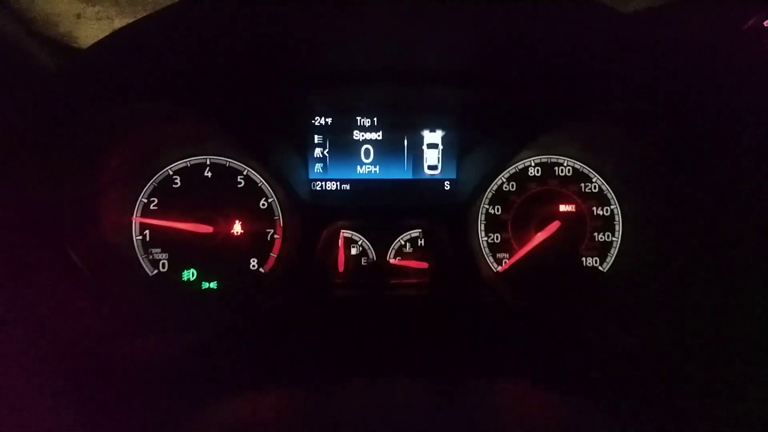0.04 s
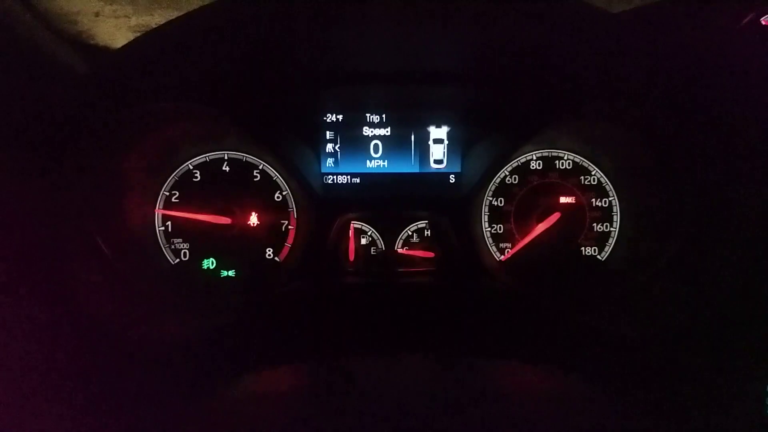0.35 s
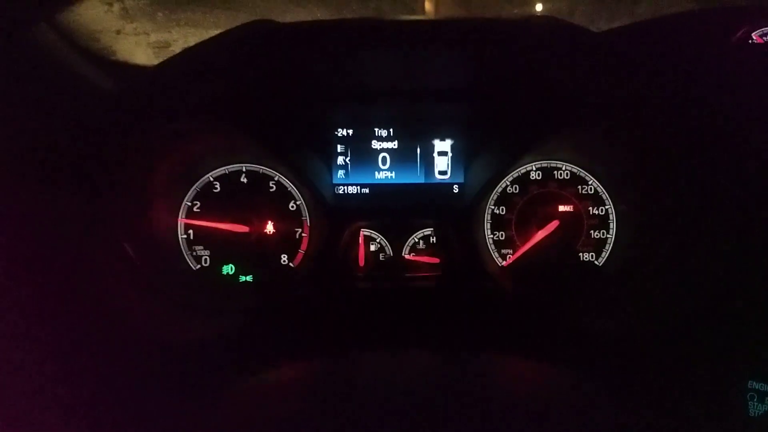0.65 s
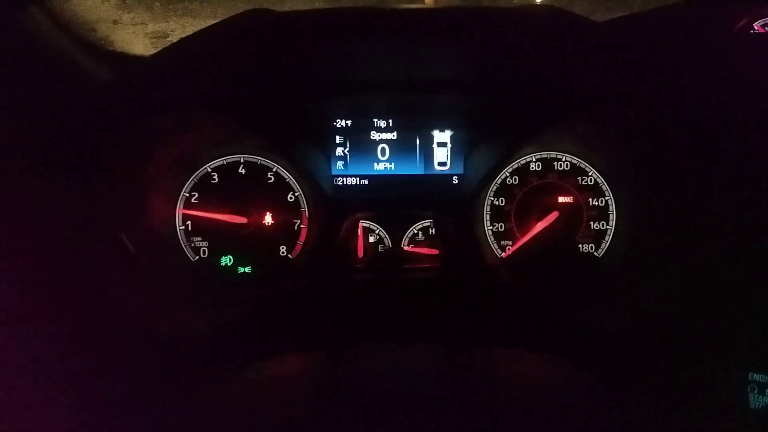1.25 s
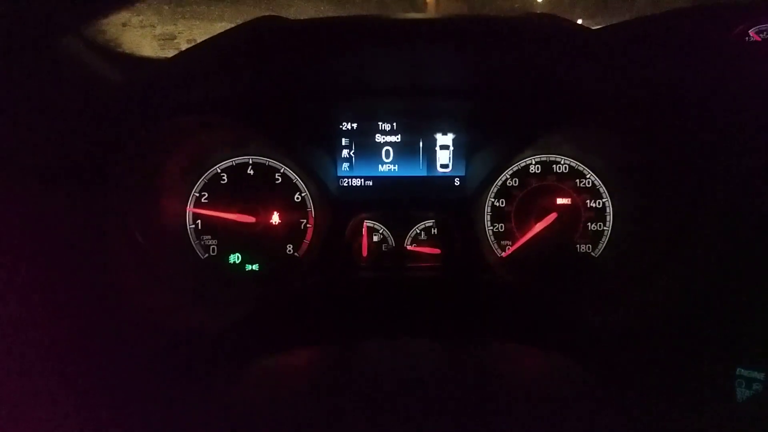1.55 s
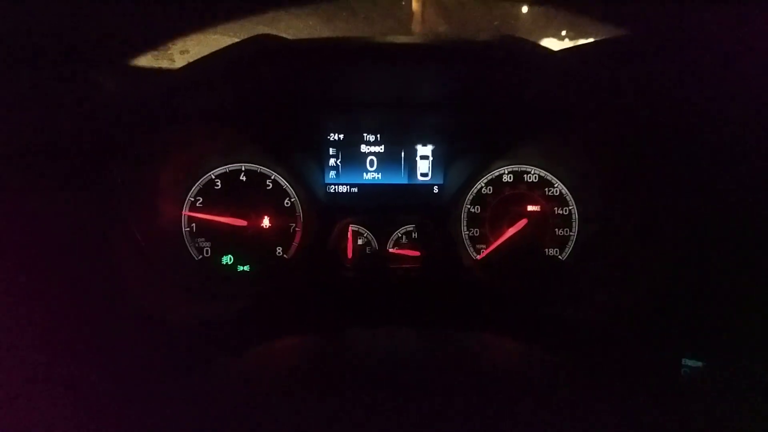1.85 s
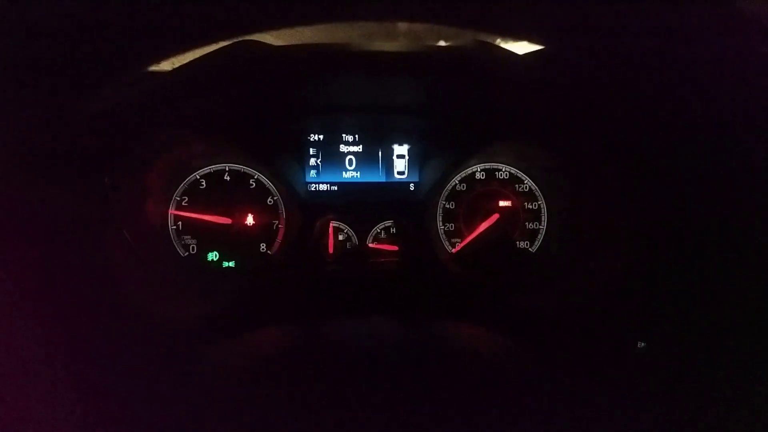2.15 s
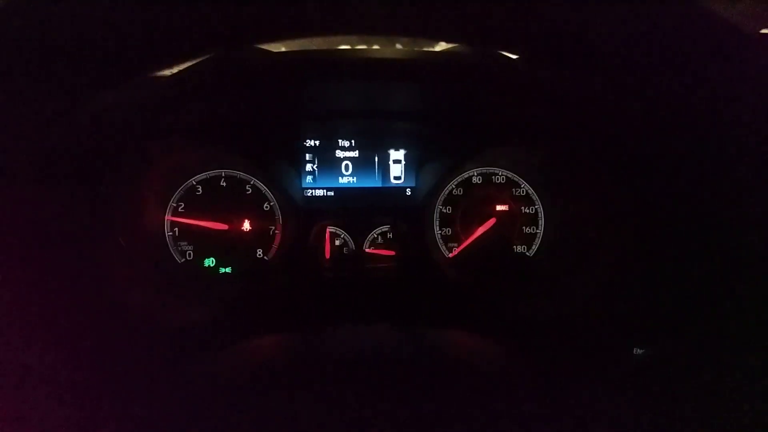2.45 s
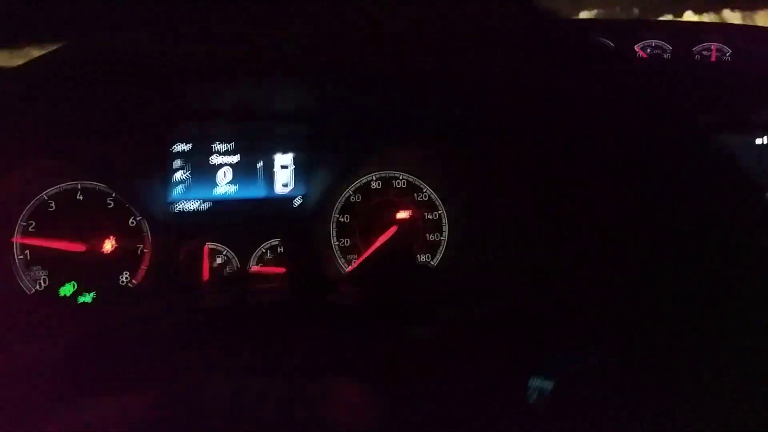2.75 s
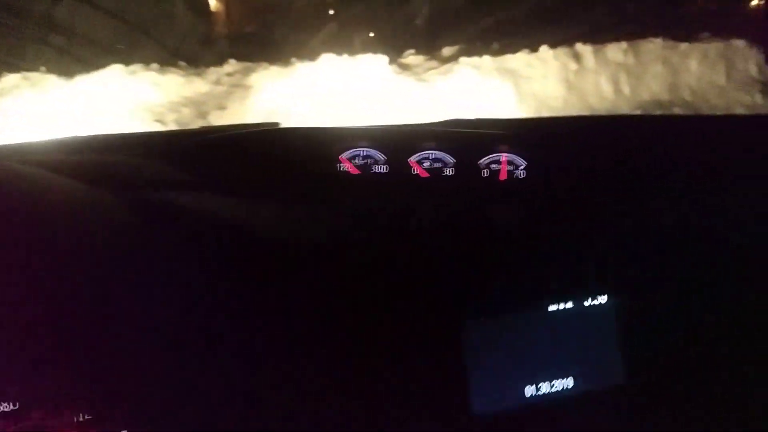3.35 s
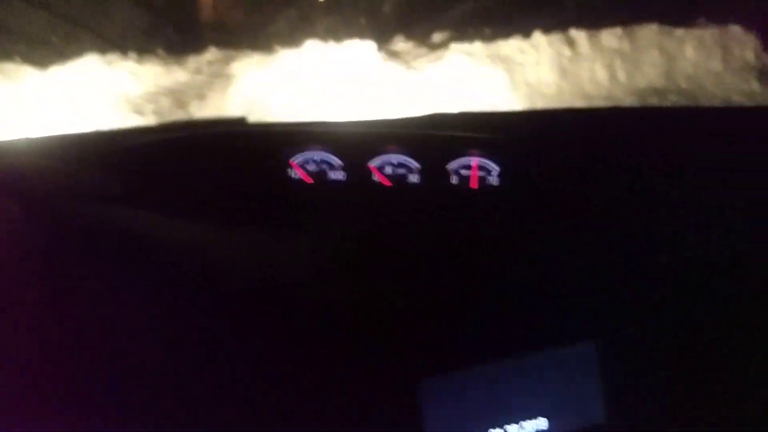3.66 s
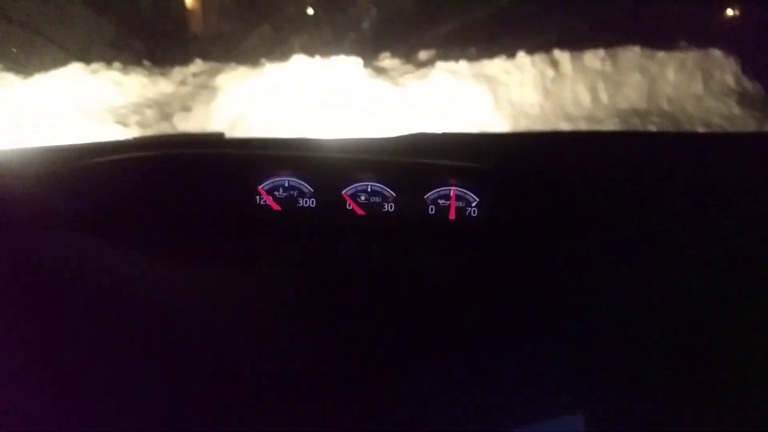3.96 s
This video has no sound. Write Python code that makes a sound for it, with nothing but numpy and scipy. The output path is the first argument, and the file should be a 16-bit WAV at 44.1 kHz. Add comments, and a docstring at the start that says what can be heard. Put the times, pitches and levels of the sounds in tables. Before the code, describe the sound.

A car engine idles fast, a steady low boom over a dull clatter, heard from the driver's seat. Past halfway, a jacket rustles and fingers bump the moving microphone, with one sharp plastic click.

```python
"""In the driver's seat of a car, a cold four-cylinder engine idles fast. Its firing makes the cabin
boom, at twice the firing rate, over a dull clatter. A jacket rustles as the hand-held microphone
swings from the steering wheel to the middle of the dashboard, with soft bumps and one sharp click.
At the dashboard the engine's overtones have a different balance and a throbbing whine comes through.
A faint electrical hiss lies under it all."""
import sys
import numpy as np
from scipy import signal
from scipy.fft import rfft, irfft
from scipy.io import wavfile

SR = 44100
rng = np.random.default_rng(int(sys.argv[2]) if len(sys.argv) > 2 else 0)


def generate_wav(sig):
    """Save sig (samples, or channels by samples) to the path in sys.argv[1] as 16-bit PCM at SR."""
    pcm = np.round(np.clip(np.atleast_2d(sig).T, -1, 1) * 32767).astype(np.int16)
    wavfile.write(sys.argv[1], SR, pcm)


N = 176400
T = np.arange(N) / SR
HZ = np.maximum(np.fft.rfftfreq(N, 1 / SR), 1)


# The engine's tones at the wheel and at the dashboard; a pan above 0 leans left.
# waves_per_turn, wheel_db, dash_db, wheel_pan_db, dash_pan_db
ENGINE_TONES = [(2, -41.5, -40.5, 2, 3), (4, -23.5, -23.5, 3, 3), (6, -42.5, -40.5, -3, 43),
                (8, -50.5, -50, 28, 15), (10, -49.5, -46.5, -26, 13)]
# How the boom swells: time_s, gain_db
BOOM_GAIN = [(0, 1.3), (.75, 1.8), (1.55, 0.5), (3.1, 0.05), (3.7, 0.9)]

def engine_tones(crank, moved, boom_per_turn=4):
    """Firing pulses make tones; echoes in the cabin make each louder or softer from spot to spot."""
    out = 0
    for per_turn, wheel_db, dash_db, wheel_pan, dash_pan in ENGINE_TONES:
        gain = from_db(blend(wheel_db, dash_db, moved))
        phase = per_turn * crank
        if per_turn == boom_per_turn:
            uneven_cylinders = 1 + 0.035 * np.cos(crank / 2) + 0.035 * np.cos(crank)
            gain *= uneven_cylinders * from_db(in_time(BOOM_GAIN) + 0.5 * drift(rate_hz=4.2))
            phase = phase + np.array([[0], [1]])  # the right side is one radian ahead
        out += gain * pan(blend(wheel_pan, dash_pan, moved)) * tone(phase)
    return out


# The clatter's dull colour: pitch_hz, gain_db
CLATTER_COLOUR = [(20, -28), (45, -5.5), (130, 3.5), (200, -3), (330, -2.5), (560, -5), (800, -12.5),
                  (1700, -19.5), (2400, -23), (3500, -36), (7000, -51)]

def engine_clatter(crank, moved, wheel_db=-36.5, dash_db=-33.5, repeat_share=0.57, rumble_top_hz=337):
    """Valves and injectors rattle in a pattern that repeats every engine cycle (two turns)."""
    cycles = crank / (4 * np.pi)
    cycle_samples = int(N / cycles[-1])
    place_in_cycle = (cycles % 1 * cycle_samples).astype(int)
    pattern = rng.standard_normal((2, cycle_samples))[:, place_in_cycle]
    noise = np.sqrt(repeat_share) * pattern + np.sqrt(1 - repeat_share) * white()
    rumble = irfft(rfft(noise) / (1 + (HZ / rumble_top_hz) ** 4), N)
    cylinder_pulse = 1 + 0.42 * np.cos(2 * crank) + 0.11 * np.cos(crank / 2)
    pump_pulse = 1 + 0.13 * np.cos(3 * crank / 2)
    clatter = rumble * cylinder_pulse + (noise - rumble) * pump_pulse
    return from_db(blend(wheel_db, dash_db, moved)) * surround(clatter, CLATTER_COLOUR)


def engine_chug(crank, moved, wheel_db=-46, dash_db=-40.5, sharpness=8.7, waves_per_turn=6):
    """One cylinder runs harder than the rest: a low thud in every engine cycle."""
    thud = np.exp(sharpness * np.cos(crank / 2)) * np.sin(waves_per_turn * crank)
    return from_db(blend(wheel_db, dash_db, moved)) * unit_level(thud)


# The tones of the turning parts: waves_per_turn, wheel_db, dash_db
WHIRR_TONES = [(13, -56, -47), (15.8, -54, -58), (19, -57, -53), (20, -54, -48), (22, -49, -44.5),
               (25, -64, -55), (26.2, -53, -62), (32.5, -66, -57), (34, -68, -55), (40, -64, -59),
               (44.1, -57, -68), (47.7, -58, -61)]

def engine_whirr(crank, moved):
    """Gears, belt and valve parts give thin, slightly wavering tones as they turn."""
    out = 0
    for per_turn, wheel_db, dash_db in WHIRR_TONES:
        offset_rad = rng.uniform(0, 2 * np.pi) + rng.normal(0, 0.4, (2, 1))
        phase = per_turn * crank + offset_rad + 0.19 * drift(rate_hz=5.3)
        out += from_db(blend(wheel_db, dash_db, moved)) * tone(phase)
    return pan(4) * out


def engine_whine(crank, moved, dash_db=-45.5, waves_per_turn=58.5, right_lag_rad=0.63):
    """A wavering whine throbs three times per engine cycle, as a three-lobed fuel pump would."""
    sway = np.sin(crank) + 0.7 * drift(rate_hz=20)
    phase = waves_per_turn * crank + sway - np.array([[0], [right_lag_rad]])
    throb = np.exp(0.52 * np.cos(3 * crank / 2) + 0.07 * np.cos(crank / 2))
    return from_db(dash_db) * moved * unit_level(throb * np.sin(phase))


# How loudly the sleeve rustles: time_s, level_db
RUSTLE_LEVEL = [(0, -51.5), (.5, -63), (1.2, -58.5), (1.48, -50), (1.87, -55.5), (1.95, -65), (2.2, -59),
                (2.29, -47.5), (2.5, -43), (2.72, -38.5), (2.88, -40.5), (3.1, -39.5), (3.4, -41),
                (3.56, -41.5), (3.72, -52.5), (4, -63)]
# The rustle's colour: pitch_hz, gain_db
RUSTLE_COLOUR = [(200, 6), (700, -10), (1300, -2), (2300, -0.5), (3800, -3), (5500, -7.5), (8000, -11.5),
                 (11000, -15.5), (16000, -23)]
# How loudly sliding cloth hisses: time_s, level_db
SLIDE_LEVEL = [(0, -57), (.5, -68), (1.2, -71), (1.38, -55), (1.86, -62), (2, -80), (2.2, -70), (2.3, -54),
               (2.66, -46), (2.8, -70), (3.55, -64), (3.7, -81)]
# Its airy colour: pitch_hz, gain_db
SLIDE_COLOUR = [(4000, -22), (8000, -31), (11500, -8), (13500, -5), (16000, -2)]
# Moments when the cloth catches: middle_s, level_db, half_length_s
CATCHES = [(0.865, -51, 0.0092), (2.279, -44, 0.0089), (2.488, -27, 0.0006), (2.967, -32.5, 0.0018),
           (3.058, -33, 0.0071), (3.327, -34, 0.012), (3.474, -35, 0.0069), (3.533, -40, 0.019),
           (3.685, -44, 0.0091)]
# Their scratchy colour: pitch_hz, gain_db
CATCH_COLOUR = [(500, -46), (1500, 8), (3500, 5.5), (5500, -2.5), (9000, -13.5), (16000, -26)]

def jacket():
    """The sleeve rustles, hisses as it slides and catches in short scuffs."""
    rustle = from_db(in_time(RUSTLE_LEVEL)) * surround(friction(), RUSTLE_COLOUR)
    slide = from_db(in_time(SLIDE_LEVEL)) * surround(white(), SLIDE_COLOUR)
    catch_gain = sum(from_db(level_db) * np.exp(-0.5 * ((T - middle_s) / half_length_s) ** 2)
                     for middle_s, level_db, half_length_s in CATCHES)
    scuffs = catch_gain * surround(friction(), CATCH_COLOUR)
    return pan(-2) * (rustle + slide + scuffs)


# How loudly the hand rubs: time_s, level_db
HAND_LEVEL = [(2.2, -74), (2.36, -46), (2.5, -47.5), (2.8, -39.5), (3, -49), (3.2, -66)]
# The rubbing's low colour: pitch_hz, gain_db
HAND_COLOUR = [(100, -29), (300, 10.5), (900, 9), (2500, -23)]
# Soft finger bumps: start_s, strength_db, dull_above_hz
FINGER_BUMPS = [(2.32, -23, 1700), (2.3375, -23, 2000), (2.3865, -28, 1300), (2.473, -18, 950),
                (2.563, -17, 950), (2.689, -22, 1000)]
# The notes the casing rings with: pitch_hz, gain_db, ring_s
CASING_NOTES = [(603, -5.5, 0.014), (990, -4.5, 0.0085), (1590, -1, 0.0045)]

def handling():
    """Fingers rub and bump the microphone's casing."""
    out = from_db(in_time(HAND_LEVEL)) * surround(friction(), HAND_COLOUR)
    for start_s, strength_db, dull_above_hz in FINGER_BUMPS:
        soften = signal.butter(2, dull_above_hz, fs=SR, output="sos")
        out += signal.sosfilt(soften, strike([(start_s, strength_db)], CASING_NOTES))
    return out


# A hard click and its bounce: start_s, strength_db
CLICK_HITS = [(3.0915, -19), (3.0972, -34)]
# The notes the plastic rings with: pitch_hz, gain_db, ring_s
PLASTIC_NOTES = [(820, -3.5, 0.033), (1440, -5.5, 0.023), (1650, -11, 0.031), (2970, -4, 0.013),
                 (3860, 2.5, 0.0064), (5340, 0, 0.0051), (7100, -8, 0.0046)]

def plastic_click():
    """A piece of plastic clicks and rings briefly, a little to the right."""
    return pan(-3.5) * strike(CLICK_HITS, PLASTIC_NOTES)


# A faint, very high whistle: pitch_hz, level_db, pan_db
WHISTLE_TONES = [(12250, -69, -42)]
# The hiss's colour: pitch_hz, gain_db
HISS_SHAPE = [(4000, -1), (7000, -2.5), (10500, 1), (13000, -5)]

def electronics(hiss_db=-58):
    """The electronics add a thin whistle and a steady hiss."""
    whistle = sum(from_db(level_db) * pan(pan_db) * tone(2 * np.pi * hz * T + 0.9 * drift(rate_hz=16))
                  for hz, level_db, pan_db in WHISTLE_TONES)
    return whistle + from_db(hiss_db) * pan(-1) * surround(white(), HISS_SHAPE)


# How much of the other's delayed sound each microphone opening subtracts: pitch_hz, share
LEAK = [(100, 0), (500, 0.21), (1100, 0.57), (2300, 0.86), (4600, 0.45), (9500, 0.38), (16000, 0)]
# How wide the cabin sounds: pitch_hz, side_gain_db
CABIN_WIDTH = [(50, 6.5), (200, -4), (1100, -4), (1700, 2), (3000, 0.5)]

def surround(noise_pair, colour, delay_s=0.0004326):
    """Two noises become one coloured sound, of level 1, all around the microphone's two openings."""
    leak = np.clip(by_pitch(LEAK), 0, 1) * np.exp(-2j * np.pi * HZ * delay_s)
    mid, side = rfft(noise_pair) * from_db(by_pitch(colour)) / np.sqrt(1 + abs(leak) ** 2)
    mid *= 1 - leak
    side *= (1 + leak) * from_db(by_pitch(CABIN_WIDTH))
    return unit_level(irfft([mid + side, mid - side], N))


def friction(ticks_per_s=900, tick_share=0.23, flutter_db=1.14):
    """Fibres catch and slip: fluttering noise full of tiny, uneven ticks."""
    ticks = (rng.random((2, N)) < ticks_per_s / SR) * np.sign(white())
    ticks *= from_db(3 * np.minimum(rng.exponential(1, (2, N)), 4))
    noise = np.sqrt(tick_share) * unit_level(ticks) + np.sqrt(1 - tick_share) * white()
    return noise * from_db(flutter_db * drift(rate_hz=16))


def strike(hits, notes, spread_db=2):
    """Each hit rings all of an object's notes; each note fades by 60 dB in its ring_s."""
    start_s, strength_db = np.transpose(hits)
    out = np.zeros((2, N))
    for k, (pitch_hz, gain_db, ring_s) in enumerate(notes):
        chance_db = spread_db * rng.standard_normal((len(hits), 2)).T
        taps = np.zeros((2, N))
        taps[:, (start_s * SR).astype(int)] = from_db(strength_db + gain_db + chance_db)
        fade, step_rad = from_db(-60 / (ring_s * SR)), 2 * np.pi * pitch_hz / SR
        feedback = [1, -2 * fade * np.cos(step_rad), fade ** 2]
        out += (-1) ** k * signal.lfilter([0, np.sin(step_rad)], feedback, taps + 1e-18)
    return out


def from_db(db):
    """Turn decibels into a number to multiply by."""
    return 10 ** (np.asarray(db) / 20)


def unit_level(x):
    """Scale a sound so its average (rms) level is 1."""
    return x / np.sqrt(np.mean(x ** 2) + 1e-20)


def tone(phase):
    """A pure tone of level 1."""
    return np.sqrt(2) * np.sin(phase)


def white():
    """Two unrelated plain noises."""
    return rng.standard_normal((2, N))


def drift(rate_hz):
    """A random wobble of level 1, mostly slower than rate_hz."""
    return unit_level(irfft(rfft(rng.standard_normal(N)) / (1 + (HZ / rate_hz) ** 2), N))


def pan(db):
    """Left and right gains, with the left louder by db."""
    gains = from_db(np.array([[.5], [-.5]]) * db)
    return gains / np.sqrt(np.mean(gains ** 2, axis=0))


def blend(at_wheel, at_dash, moved):
    """Slide from the wheel's value to the dashboard's."""
    return at_wheel + moved * (at_dash - at_wheel)


def in_time(rows):
    """Join a table's points into a curve over time."""
    return np.interp(T, *np.transpose(rows))


def by_pitch(rows):
    """Join a table's points into a curve over pitch."""
    hz, value = np.transpose(rows)
    return np.interp(np.log(HZ), np.log(hz), value)


# How fast the engine turns: time_s, speed_rpm
ENGINE_SPEED = [(0.0, 1461), (0.4, 1458), (0.8, 1490), (1.1, 1507), (1.55, 1514), (1.9, 1518), (2.5, 1525),
                (2.9, 1515), (3.2, 1517), (3.6, 1517), (4.0, 1495)]

def scene(move_start_s=2.44, move_end_s=3.14):
    """The engine idles while the microphone moves from the wheel to the dashboard."""
    crank = 2 * np.pi * np.cumsum(in_time(ENGINE_SPEED)) / 60 / SR  # engine shaft's angle in radians
    moved = in_time([(move_start_s, 0), (move_end_s, 1)])  # 0 at the wheel, 1 at the dashboard
    engine = engine_tones(crank, moved) + engine_whirr(crank, moved) + engine_clatter(crank, moved)
    engine += engine_chug(crank, moved) + engine_whine(crank, moved)
    return engine + jacket() + handling() + plastic_click() + electronics()


def record(dry):
    """The very highest treble is cut off steeply."""
    cutoff_hz = 15800
    return signal.sosfilt(signal.ellip(12, .1, 80, cutoff_hz, fs=SR, output="sos"), dry)


dry = scene()
out = record(dry)
generate_wav(out)
```